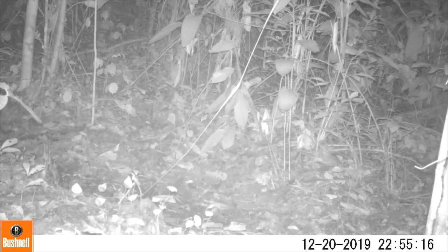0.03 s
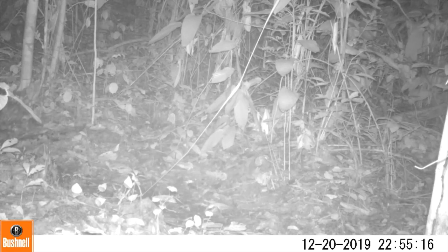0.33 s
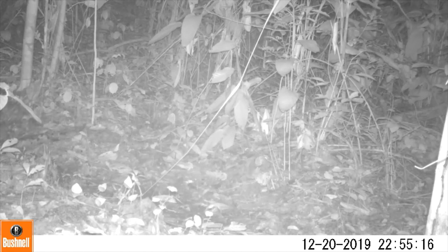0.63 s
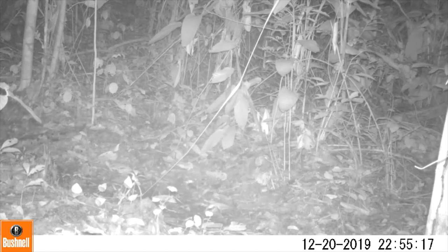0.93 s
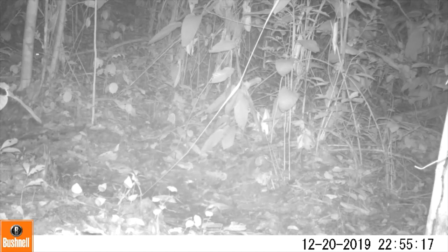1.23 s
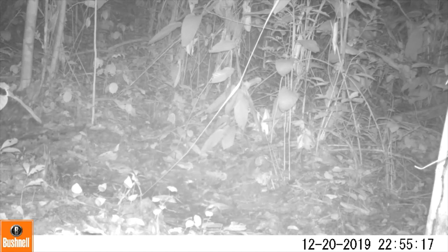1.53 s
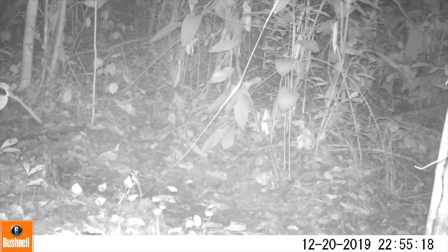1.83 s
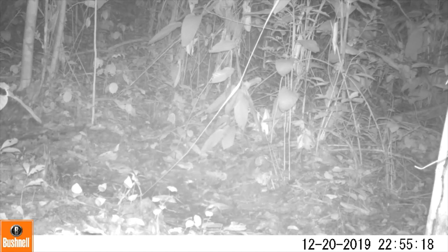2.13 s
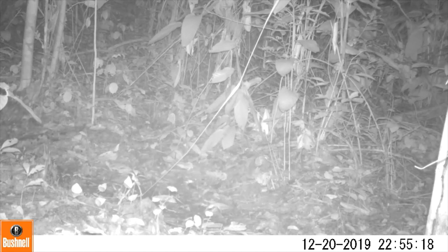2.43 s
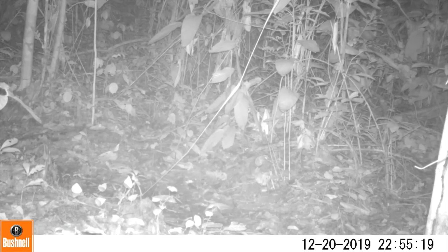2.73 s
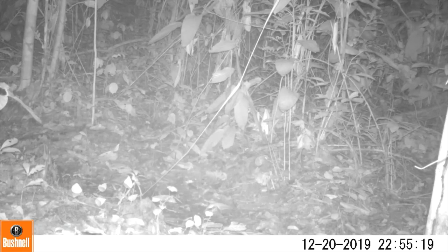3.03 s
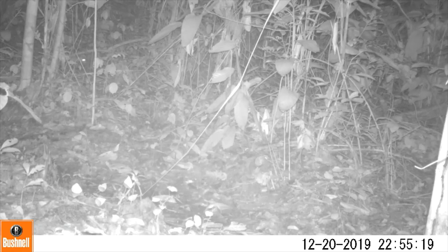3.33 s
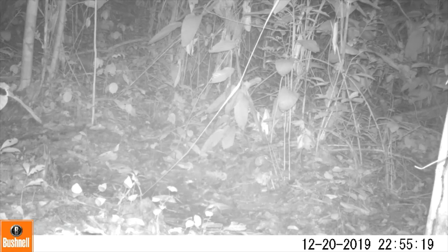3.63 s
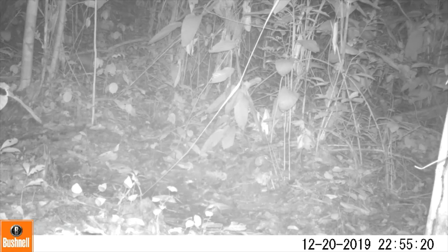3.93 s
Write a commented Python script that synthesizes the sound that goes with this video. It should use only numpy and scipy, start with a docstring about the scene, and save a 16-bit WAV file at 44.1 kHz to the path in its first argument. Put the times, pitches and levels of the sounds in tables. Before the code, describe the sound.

A night chorus of crickets trills among trees, a katydid rasping twice over it.

```python
"""Near crickets chirp in a forest at night, each wing stroke ringing one brief, sagging note.
Further crickets swell and ebb, a higher one answers, a lone one trills lower and rests, two low
choruses drone, and a small high cricket chirps far off. Twice a katydid rasps nine very high, rising
strokes, its scraper exciting the wing tooth by tooth. Trunks and leaves scatter the calls into
reverberation. The whole background of soft air rumble, hiss and drone drops briefly now and then."""
import sys
import numpy as np
from scipy import signal
from scipy.fft import rfft, irfft, next_fast_len
from scipy.io import wavfile
from scipy.ndimage import map_coordinates

SR = 44100
rng = np.random.default_rng(int(sys.argv[2]) if len(sys.argv) > 2 else 0)


def wav_record(signal):
    """Record a signal, one row per channel, as 16-bit PCM in the file named by sys.argv[1]."""
    frames = np.transpose(np.atleast_2d(signal))
    bounded = np.clip(frames, -1, 1)
    # unit amplitude maps onto the largest positive 16-bit level
    quanta = np.round(bounded * 32767).astype(np.int16)
    wavfile.write(sys.argv[1], SR, quanta)


N = 176400

# Wing strokes of the near crickets: peak_s, level_db
NEAR_STROKES = [(.15, -22), (.188, -19.5), (.216, -17.5), (.254, -18.5), (.288, -20.5), (.321, -22),
                (.354, -22.5), (.677, -22), (.746, -21), (1.278, -18.5), (1.315, -19.5), (1.345, -20.5),
                (1.382, -21.5), (1.42, -16.5), (1.456, -18), (1.601, -19.5), (1.771, -22.5), (1.81, -21),
                (1.844, -21), (1.877, -20), (1.915, -20.5), (1.95, -18), (1.985, -18.5), (2.007, -29),
                (2.081, -21), (2.336, -19.5), (2.37, -24), (2.406, -20.5), (2.442, -19), (2.496, -21),
                (2.531, -20.5), (2.565, -20), (2.869, -18), (2.901, -20.5), (2.935, -22), (2.969, -23.5),
                (3.006, -18), (3.042, -18.5), (3.079, -20), (3.19, -18.5), (3.232, -20), (3.467, -21.5),
                (3.497, -23.5), (3.532, -21), (3.571, -20.5), (3.607, -20), (3.678, -21), (3.958, -19.5),
                (3.993, -19)]
# Further crickets: pitch_hz, strokes_per_s, level_db
NEIGHBOURS = [(6488, 35, -39), (6340, 28.4, -36), (6290, 23, -42)]
# Swell of the chorus, taken relative to its mean: time_s, level_db
CHORUS_SWELL = [(0, -35.5), (.25, -34), (.47, -34), (.8, -30.5), (.97, -39), (1.2, -36.5), (1.37, -35),
                (1.7, -39), (1.87, -32), (2.28, -37.5), (2.6, -30.5), (2.82, -35), (3.17, -35),
                (3.3, -35.5), (3.57, -33), (3.8, -37), (4, -36.5)]
# Chirps of the answering cricket: middle_s
ANSWERS = [.25, .73, 1.35, 2.18, 2.67, 3.12, 3.55, 3.92]
# Trills of the lone cricket: start_s, end_s
TRILLS = [(-.2, 1.394), (2.64, 4.2)]
# Katydid phrases: start_s, stroke_period_s, level_db
RASPS = [(0.5667, .0542, -38), (2.1233, .0541, -37.5)]
# Faint, brief, blurred tones: middle_s, length_s, pitch_hz, level_db
FAINT_TONES = [(1.685, 0.11, 7160, -53), (1.986, 0.19, 7100, -50)]
# Loudness contours: time_s, level_db
SMALL_CRICKET_LEVEL = [(0, -71), (1.15, -54), (1.45, -52.5), (1.76, -50), (1.9, -72), (3.08, -51),
                       (3.4, -57)]
SIZZLE_LEVEL = [(0, -53), (.4, -54.5), (1.1, -46), (1.35, -66), (2.1, -57), (2.65, -51.5), (2.85, -65),
                (3.3, -61), (3.7, -49), (4, -51)]
# Brief drops in the level of the whole background: middle_s
DIPS = [0.172, .22, 0.262, 0.627, 0.712, .812, .942, .968, 1.18, 1.287, 1.458, 1.619, 1.902, 1.943, 2.133,
        2.482, 2.517, 2.652, 2.697, 2.905, 3.078, 3.176, 3.455]
# Noise spectra: frequency_hz, relative_db
SCRAPE_BAND = [(8800, -64), (9700, 6.5), (10400, -9), (11000, 17), (12150, -2), (12450, -33), (13000, -52)]  # friction of the katydid's scraper
FAR_CHORUS_BAND = [(5000, -71), (5950, -21), (6130, 0), (6230, 14), (6330, 16), (6480, 7.5), (6620, -4),
                   (6750, 1), (7000, -36), (7400, -71)]
LOWER_DRONE_BAND = [(1700, -71), (1950, -24), (2050, -3), (2130, -3.5), (2200, 1), (2280, -6), (2370, -22),
                    (2600, -64)]
UPPER_DRONE_BAND = [(2150, -57), (2400, -13.5), (2520, -4.5), (2620, -1), (2740, -4.5), (2850, -8),
                    (3000, -20.5), (3300, -69)]
SIZZLE_BAND = [(8500, -42), (9400, 4), (9900, 12), (10900, 16), (11600, 14), (12200, -43), (13000, -42)]  # far katydids
HAZE_BAND = [(1200, -38), (1900, -13), (3000, -17.5), (3350, -12.5), (3800, -10.5), (4150, -2), (4450, 0),
             (4800, -16.5), (5200, 0.5), (5800, 3), (6500, 6), (7200, -30), (7800, -3.5), (8200, -9),
             (8600, -3), (9100, -14), (11000, -9), (12500, -15), (14000, -23)]  # distant insects
AIR_BAND = [(12, -22), (20, 1.5), (54, 0), (121, -4), (370, -12.5), (1850, -31.5), (2400, -27),
            (4070, -120)]


def near_crickets(pitch_hz=6319, scatter_hz=12.3, sag_hz_per_s=4500, rise_s=.0046, fall_s=.0058):
    """Wing resonance: each stroke swells and fades on one sagging note; the undergrowth smears it."""
    out = np.zeros(N + SR)
    t = np.arange(-SR // 40, SR // 40) / SR  # time from the stroke's peak
    envelope = np.exp(-.5 * (t / np.where(t < 0, rise_s, fall_s)) ** 2)
    for peak_s, level_db in NEAR_STROKES:
        detune, phase = rng.standard_normal(2)
        turns = (pitch_hz + scatter_hz * detune - .5 * sag_hz_per_s * t) * t + phase
        start = round((peak_s + t[0]) * SR)
        out[start:start + len(t)] += amp(level_db) * envelope * np.sin(2 * np.pi * turns)
    return forest(out[:N], wet_db=-4.5, t60_s=.35)


def further_cricket(pitch_hz, strokes_per_s):
    """Diffuse field: at a distance, a trill's scattered sound outweighs its direct sound."""
    cycle = stroke_cycle(strokes_per_s, unsteady=.0502)
    song = trill(pitch_hz, cycle, sag_hz=62.6, drift_hz=14)
    return unit(forest(song, wet_db=6, t60_s=.24))


def chorus():
    """Superposition: a few crickets swell and ebb together; many far ones merge into a band of noise."""
    swell_db = curve(CHORUS_SWELL)
    swell_db -= swell_db.mean()
    voices = sum(amp(db) * further_cricket(hz, rate) for hz, rate, db in NEIGHBOURS)
    blur = amp(-37 + .5 * swell_db) * noise(FAR_CHORUS_BAND)
    return amp(swell_db) * voices + blur


def answering_cricket(chirp_s=.26):
    """Amplitude gating: a slightly higher trill sounds in flat-topped chirps."""
    chirping = sum(np.exp(-(2 * (clock() - middle_s) / chirp_s) ** 4) for middle_s in ANSWERS)
    return amp(-35) * chirping * further_cricket(pitch_hz=6563, strokes_per_s=29)


def lone_cricket(rise_s=.06, fall_s=.23):
    """Reverberation fills the gaps between strokes, so a distant trill flutters; it rests once."""
    t = clock()
    singing = sum(ramp((t - start) / rise_s, (end - t) / fall_s) for start, end in TRILLS)
    cycle = stroke_cycle(34.2, unsteady=.045)
    song = singing * trill(5372 + 8 * wobble(120), cycle, sag_hz=40, drift_hz=9.7)
    return amp(-46.5) * unit(forest(song, wet_db=2, t60_s=.43))


def katydid(stroke_s=.03, low_hz=11000, sweep_hz=1250, first_flat_hz=593, leaf_loss_db=-3):
    """Stridulation: tooth clicks sweep upward and hook over; leaves reflect the lower notes best."""
    direct, reflected, t = np.zeros(N), np.zeros(N), clock()
    for start_s, period_s, level_db in RASPS:
        index = np.clip(np.floor((t - start_s) / period_s), 0, 8)  # nine strokes
        first = index == 0  # the opening stroke is flatter and softer
        progress = np.clip((t - start_s - index * period_s) / stroke_s, 0, 1)
        envelope = ramp(progress / .22, (1 - progress) / .084)
        speed = (1 - np.abs(1 - progress / .82)) ** 1.5  # peaks 82% through the stroke
        pitch_hz = low_hz + sweep_hz * speed - first_flat_hz * first * (1 - .5 * speed)
        accent_db = speed - .5 - 1.5 * first  # loudest as the wings close
        rasp = np.sqrt(2) * teeth(pitch_hz, speed) + amp(-10) * noise(SCRAPE_BAND)
        stroke = amp(level_db + accent_db) * envelope * rasp
        direct += stroke
        reflected += stroke * amp(leaf_loss_db * speed)
    echo = forest(reflected, wet_db=0, t60_s=.25) - reflected
    return low_pass(direct + echo, cutoff_hz=12620)


def teeth(pitch_hz, speed, base_teeth_per_s=290, scatter_db=2, scatter_turns=.25):
    """Impulse excitation: each tooth caught rings the wing anew, sooner as the scraper speeds up."""
    teeth_per_s = base_teeth_per_s * (1 + .6 * speed) * amp(wobble(200))
    passed = np.cumsum(teeth_per_s) / SR
    size, slip = rng.standard_normal((N // 20, 2))[passed.astype(int)].T  # one pair per tooth
    ring = .25 + np.sin(np.pi * (passed % 1) ** .8)
    turns = np.cumsum(pitch_hz) / SR + scatter_turns * slip
    return unit(amp(scatter_db * size) * ring * np.sin(2 * np.pi * turns))


def tree_crickets(band, pitch_hz, sag_hz, strokes_per_s, singer_db, blur_db):
    """Synchrony: one regular low trill echoes through the trees; a blur of many throbs in step."""
    cycle = stroke_cycle(strokes_per_s, unsteady=.004)
    song = trill(pitch_hz, cycle, sag_hz, drift_hz=25)
    singer = unit(forest(song, wet_db=4, t60_s=.31))
    throb = 1 - .1 * np.cos(2 * np.pi * cycle)
    blur = unit(throb * noise(band))
    return amp(.8 * wobble(9)) * (amp(singer_db) * singer + amp(blur_db) * blur)


def faint_tones():
    """Spectral broadening: two faint, brief, blurred tones sound near 7.1 kHz."""
    return sum(amp(db) * np.exp(-(2 * (clock() - middle_s) / length_s) ** 2) * blurred_tone(hz)
               for middle_s, length_s, hz, db in FAINT_TONES)


def small_cricket(pitch_hz=8720, first_s=.042, period_s=.1565):
    """Periodic modulation: a far, high note pulses in even chirps, louder at times."""
    chirping = np.cos(np.pi * (clock() - first_s) / period_s) ** 2
    return amp(curve(SMALL_CRICKET_LEVEL)) * chirping * blurred_tone(pitch_hz)


def background():
    """Incoherent addition: rumbling air, insect haze and far katydids sum as bands of noise."""
    air = amp(-35.5 + 1.4 * wobble(15)) * noise(AIR_BAND)
    haze = amp(-45 + 1.65 * wobble(20)) * noise(HAZE_BAND)
    sizzle = amp(curve(SIZZLE_LEVEL) + wobble(23.96)) * noise(SIZZLE_BAND)
    return air + haze + sizzle


def forest(x, wet_db, t60_s):
    """Scattering: trunks and leaves add an exponentially decaying tail to the direct sound."""
    t = np.arange(SR // 2) / SR
    tail = rng.standard_normal(len(t)) * np.exp(-np.log(1000) * t / t60_s)
    return x + amp(wet_db) * signal.fftconvolve(x, tail / np.linalg.norm(tail))[:N]


def trill(pitch_hz, cycle, sag_hz, drift_hz):
    """Amplitude and frequency modulation: each wing stroke is a pulse that falls in pitch."""
    pulses = np.sin(np.pi * cycle) ** 4
    return unit(pulses * tone(pitch_hz + drift_hz * wobble(25) - sag_hz * (cycle - .5)))


def stroke_cycle(strokes_per_s, unsteady):
    """Phase of the wing stroke, 0-1: the integral of a wavering rate."""
    rate = strokes_per_s * (1 + unsteady * wobble(5))
    return (np.cumsum(rate) / SR + rng.random()) % 1


def blurred_tone(pitch_hz):
    """Random modulation spreads a tone into a narrow band."""
    return wobble(250) * tone(pitch_hz + 60 * wobble(220))


def tone(pitch_hz):
    """A sine whose phase is the integral of its frequency."""
    return np.sin(2 * np.pi * (np.cumsum(pitch_hz) / SR + rng.random()))


def noise(band):
    """Spectral shaping: white noise filtered to a band, at rms 1."""
    size = next_fast_len(N + 8192)
    hz, db = np.transpose(band)
    gain = amp(np.interp(np.log(np.fft.rfftfreq(size, 1 / SR) + 1), np.log(hz), db))
    return unit(irfft(rfft(rng.standard_normal(size)) * gain, size)[:N])


def low_pass(x, cutoff_hz, order=70):
    """A Butterworth magnitude response, falling steeply above the cutoff."""
    size = next_fast_len(N + 8192)
    loss = np.hypot(1, (np.fft.rfftfreq(size, 1 / SR) / cutoff_hz) ** order)
    return irfft(rfft(x, size) / loss, size)[:N]


def wobble(knots_per_s):
    """Spline interpolation through random knots."""
    knots = rng.standard_normal(int(N * knots_per_s / SR) + 4)
    return map_coordinates(knots, [clock() * knots_per_s])


def curve(rows):
    """Linear interpolation through rows of time_s, value."""
    return np.interp(clock(), *np.transpose(rows))


def ramp(rising, falling):
    """A trapezoidal envelope, 0-1."""
    return np.clip(np.minimum(rising, falling), 0, 1)


def clock():
    """Sample times in seconds."""
    return np.arange(N) / SR


def amp(db):
    """Decibels to amplitude ratio."""
    return 10 ** (np.asarray(db) / 20)


def unit(x):
    """Normalisation to rms 1."""
    return x / np.sqrt(np.mean(x ** 2) + 1e-20)


def scene():
    """Superposition of all sources; rumble, hiss and, less so, the drone drop briefly in level."""
    dip = sum(np.exp(-.5 * ((clock() - middle_s) / .005) ** 2) for middle_s in DIPS)
    drone = tree_crickets(LOWER_DRONE_BAND, pitch_hz=2165.5, sag_hz=311, strokes_per_s=33.5,
                          singer_db=-46.5, blur_db=-46)
    drone += tree_crickets(UPPER_DRONE_BAND, pitch_hz=2670.5, sag_hz=472, strokes_per_s=39,
                           singer_db=-41.5, blur_db=-43.5)
    bed = amp(-13.5 * dip) * background() + amp(-3 * dip) * drone
    crickets = near_crickets() + chorus() + answering_cricket() + lone_cricket()
    return (crickets + katydid() + faint_tones() + small_cricket() + bed)[None]


def record(dry, top_hz=14000):
    """Band limiting: an ideal low-pass removes everything above top_hz."""
    size = next_fast_len(N + 8192)
    passband = np.fft.rfftfreq(size, 1 / SR) < top_hz
    return irfft(rfft(dry, size) * passband, size)[:, :N]


dry = scene()
out = record(dry)
wav_record(out)
```